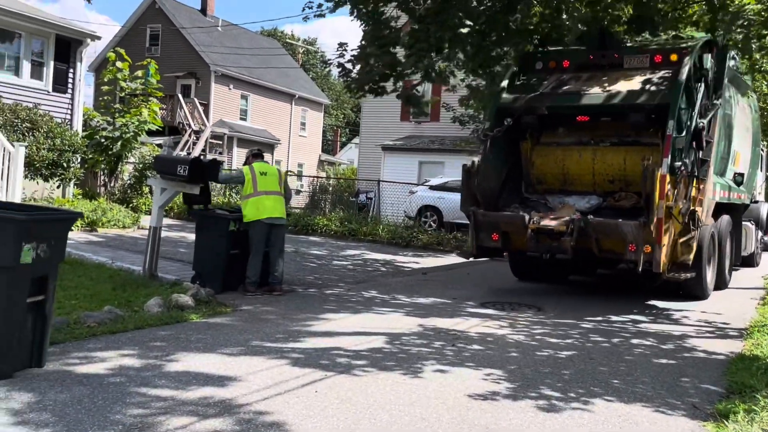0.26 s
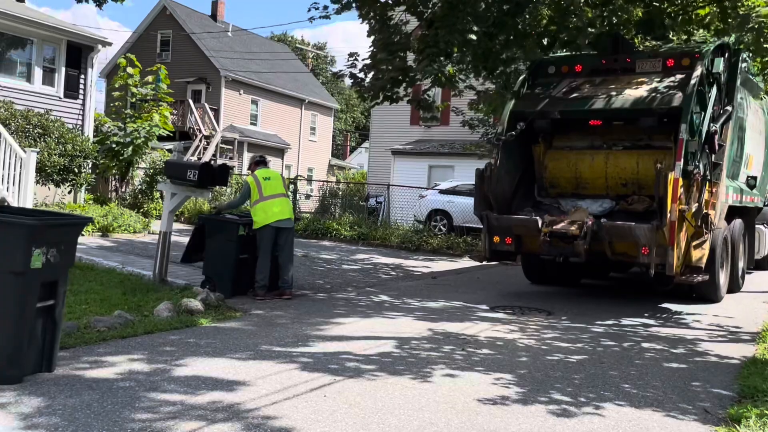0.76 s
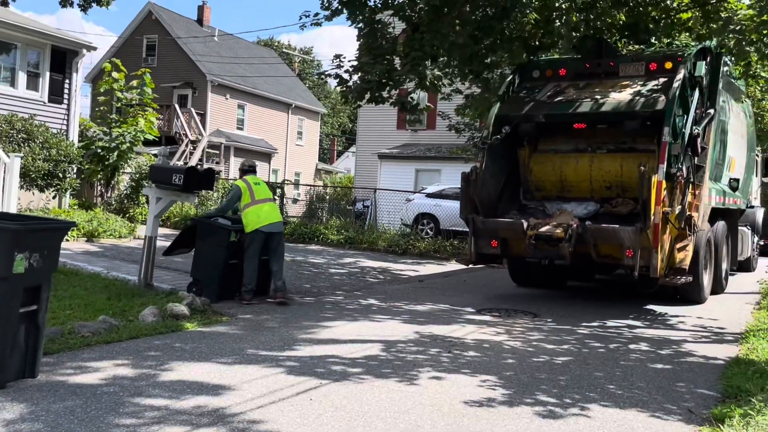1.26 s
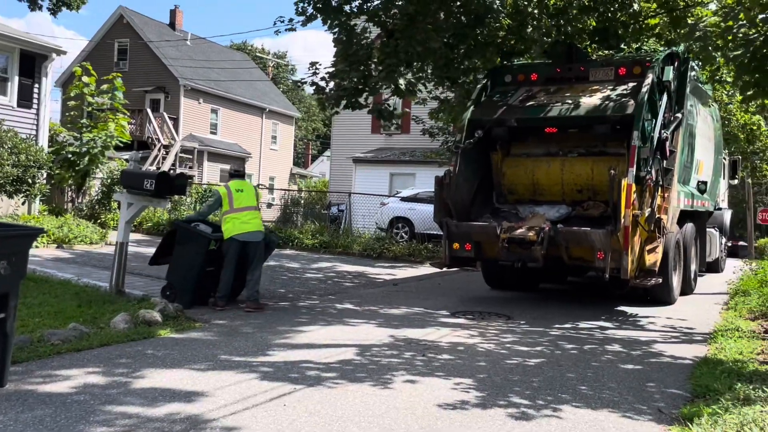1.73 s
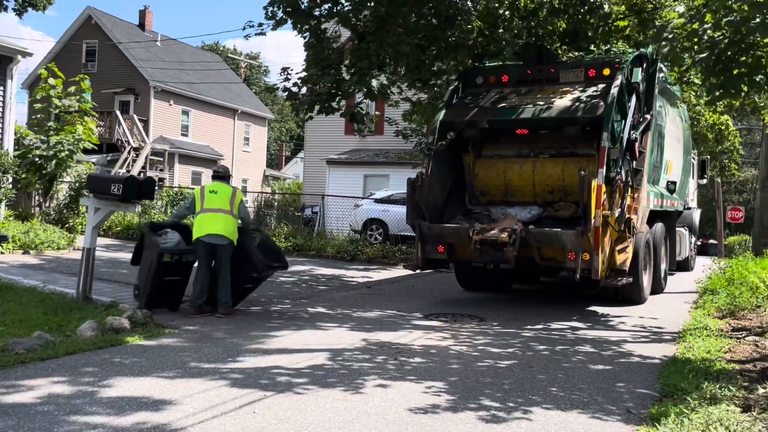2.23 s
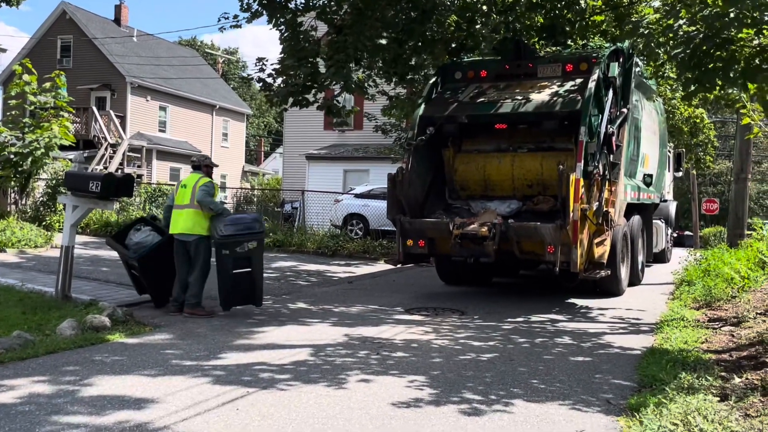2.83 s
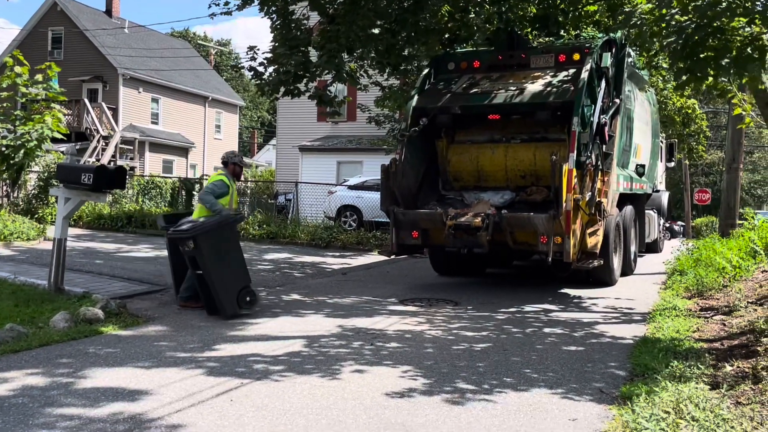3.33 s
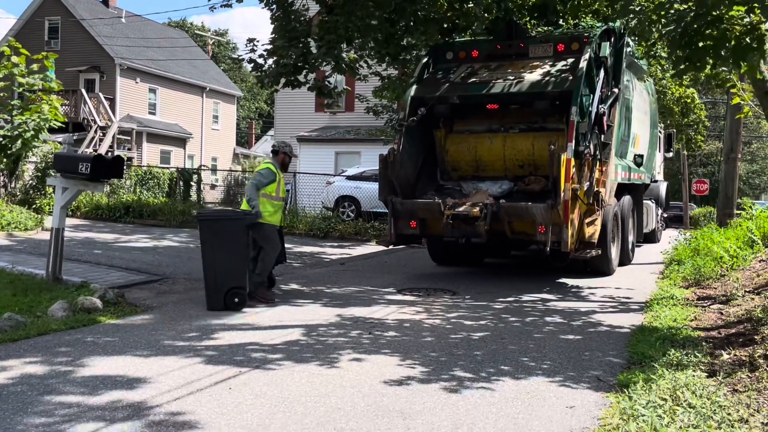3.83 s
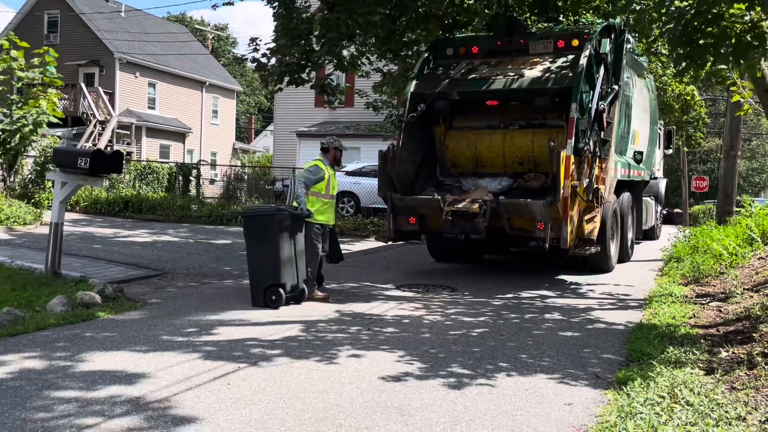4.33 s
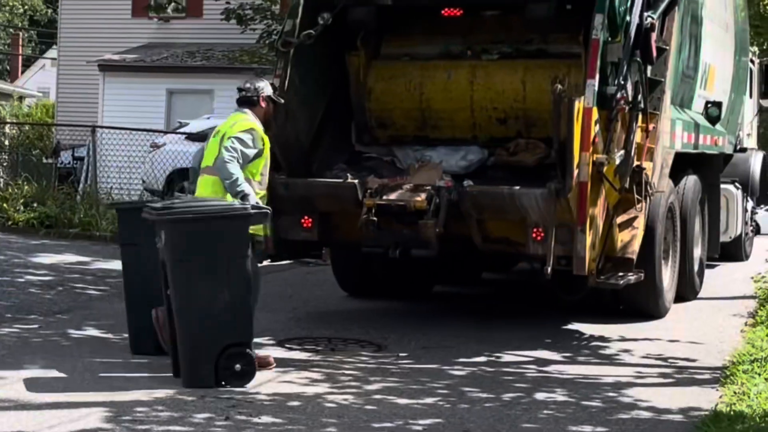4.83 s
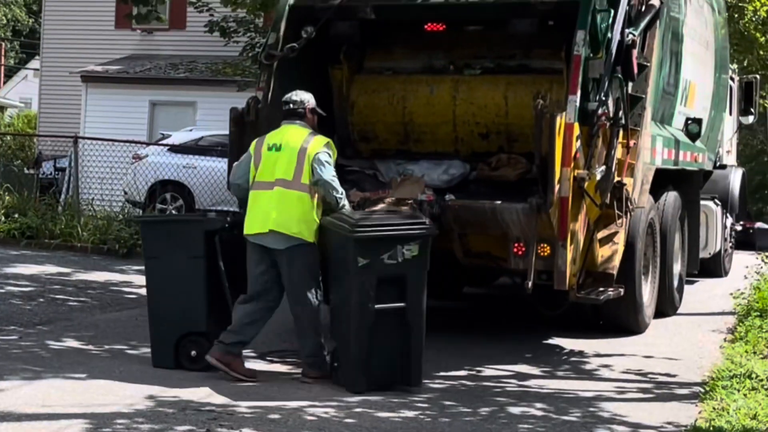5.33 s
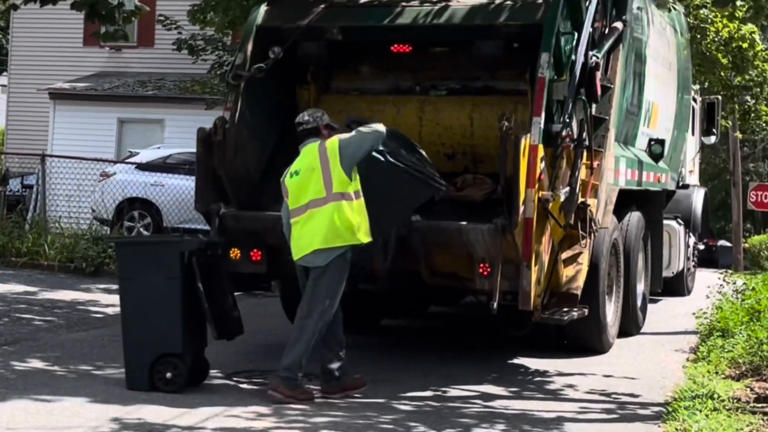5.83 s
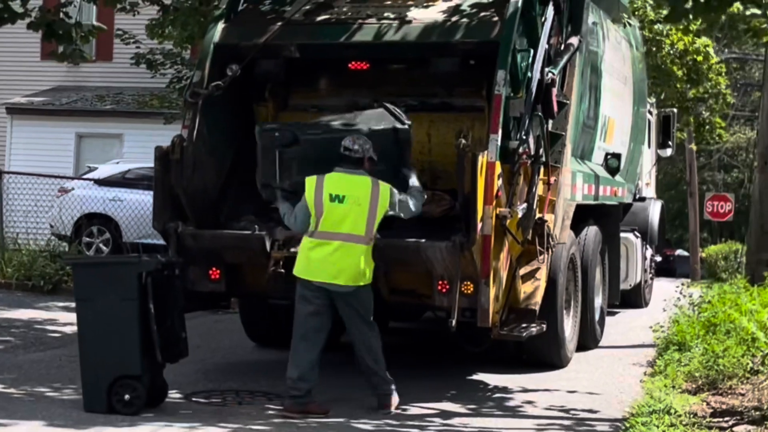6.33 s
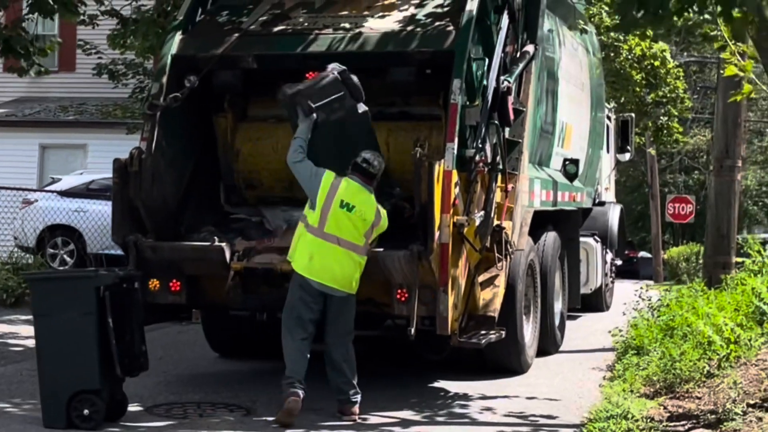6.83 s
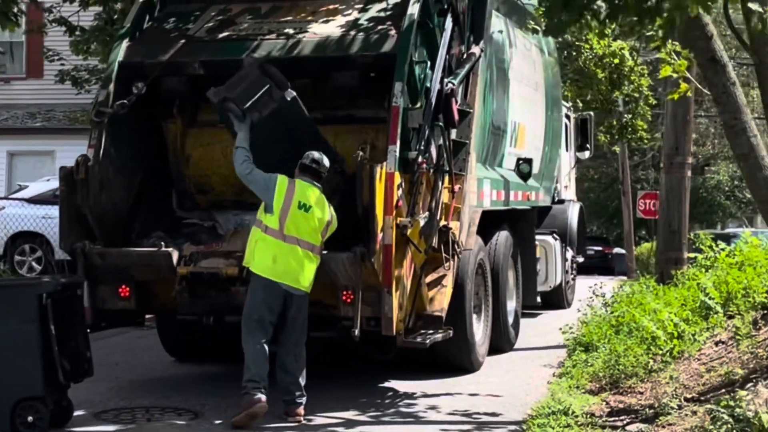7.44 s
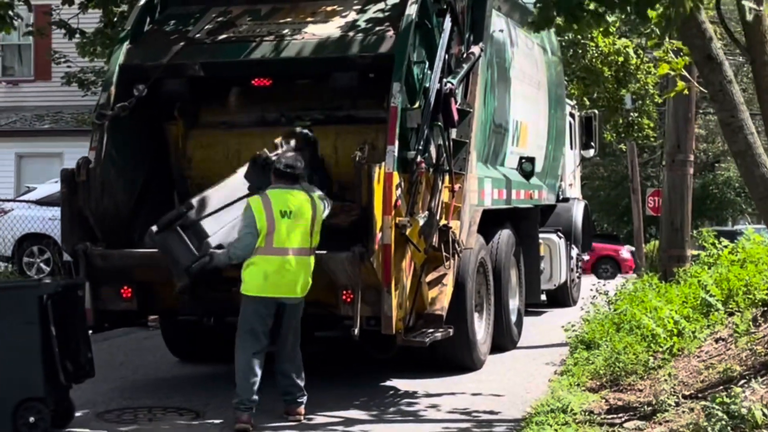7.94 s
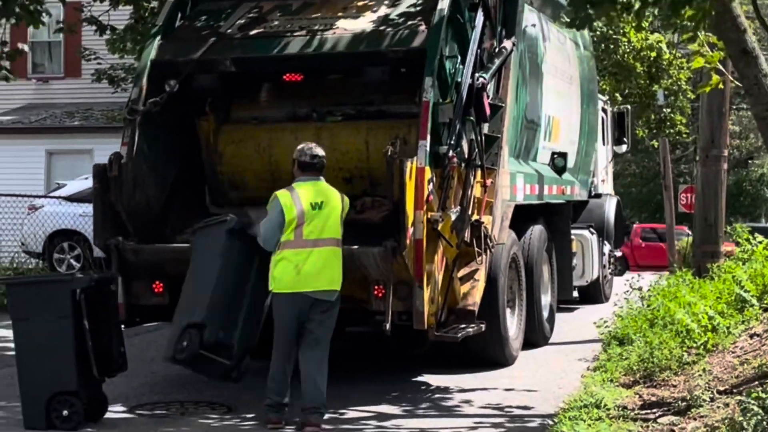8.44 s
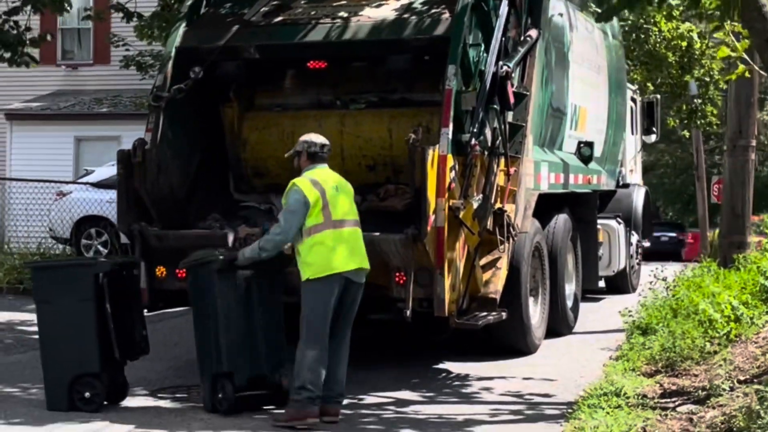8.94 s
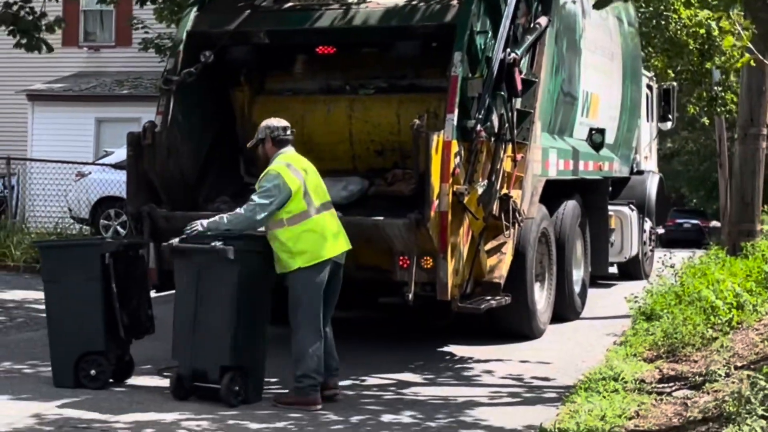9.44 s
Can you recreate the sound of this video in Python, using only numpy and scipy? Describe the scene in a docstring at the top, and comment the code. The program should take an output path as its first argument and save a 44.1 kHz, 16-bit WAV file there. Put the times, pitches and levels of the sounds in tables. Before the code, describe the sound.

A garbage truck idles on a street while hollow plastic bins are wheeled over asphalt, banged against its hopper and set down.

```python
"""A diesel refuse truck idles on a street while a second engine drones and whines nearby.
An air valve puffs, a hinge squeaks and a worker slams bin lids; from 3 s hollow plastic bins
trundle over the asphalt. Near 4 s the second engine fades and the truck grows louder as the
listener draws near. A hydraulic pump swells in by 5 s; a bin bangs on the hopper sill and drops back.
House fronts echo the bins, and a phone with two close microphone ports hears it all."""
import sys
import numpy as np
from scipy import signal
from scipy.fft import rfft, irfft, next_fast_len
from scipy.io import wavfile
from scipy.ndimage import uniform_filter1d, map_coordinates

SR = 44100
rng = np.random.default_rng(int(sys.argv[2]) if len(sys.argv) > 2 else 0)


def log_audio(samples):
    """Write samples as a 16-bit WAV file to the path given in sys.argv[1]."""
    # one column per channel
    frames = np.atleast_2d(samples).T
    # limit to full scale, then quantise
    limited = np.clip(frames, -1, 1)
    pcm = np.round(limited * 32767).astype(np.int16)
    wavfile.write(sys.argv[1], SR, pcm)


N = 426447
TIME_S = np.arange(N) / SR


def amp(db):
    """dB to gain."""
    return 10 ** (np.asarray(db) / 20)


def unit(x):
    """Scaled to rms 1."""
    return x / np.sqrt(np.mean(abs(x) ** 2) + 1e-20)


def along(points, hz):
    """(Hz, value) points interpolated on a log axis."""
    point_hz, values = np.transpose(points)
    return np.interp(np.log(hz + 1), np.log(point_hz + 1), values)


def wobble(rate_hz):
    """Smooth random curve, rate_hz knots a second."""
    return map_coordinates(rng.standard_normal(int(N * rate_hz / SR) + 4), [TIME_S * rate_hz])


def held(start_s, length_s, level_db, rise_s, fall_s):
    """Gain that swells up to its start, holds, then dies; 23.5 dB per rise or fall time."""
    before = np.maximum(start_s - TIME_S, 0) / rise_s
    after = np.maximum(TIME_S - start_s - length_s, 0) / fall_s
    return amp(level_db - 23.5 * (before + after))


def filtered(x, response):
    """x times a complex response of frequency."""
    size = next_fast_len(N + SR // 2)
    return irfft(rfft(x, size) * response(np.fft.rfftfreq(size, 1 / SR)), size)[..., :N]


def coloured(x, spectrum):
    """x through a smooth spectrum that keeps the power of white noise."""
    return filtered(x, lambda hz: unit(amp(along(spectrum, hz))))


def rung(x, modes):
    """x through causal resonances that keep the power of white noise."""
    def bank(hz):
        return unit(sum((-1) ** k * amp(db) * 1j * hz * width / (centre ** 2 - hz ** 2 + 1j * hz * width)
                        for k, (centre, width, db) in enumerate(modes)))
    return filtered(x, bank)


def bursts(starts_s, levels_db, t60_s, attack_s):
    """Noise that jumps up at each start and dies away."""
    t, power = np.arange(SR // 2) / SR, np.zeros(N + SR)
    for start, db in np.broadcast(starts_s, levels_db):
        power[round(start * SR):][:len(t)] += amp(db - 60 * t / t60_s) ** 2 * (1 - np.exp(-t / attack_s))
    return np.sqrt(power[:N]) * rng.standard_normal(N)


def grains(rate_hz, spread_db, decay_s):
    """Dense random knocks of uneven size, rms 1."""
    knocks = (rng.random(N) < rate_hz / SR) * amp(2 * spread_db * rng.standard_normal(N))
    power = signal.lfilter([1], [1, -np.exp(-1 / (decay_s * SR))], knocks)
    return unit(np.sqrt(power) * rng.standard_normal(N))


def struck(starts_s, levels_db, favoured_hz, modes, focus_db_oct, flex=1, contact_s=0.0012):
    """Modes set ringing at once; the spot hit favours one pitch, and flexing plastic varies each ring."""
    t, rings = np.arange(SR // 4) / SR, np.zeros(N + SR)
    hz, width_hz, mode_db = np.transpose(modes)[..., None]
    envelope = np.exp(-np.pi * width_hz * t) * (1 - np.exp(-t / contact_s))
    for start, db, centre_hz in np.broadcast(starts_s, levels_db, favoured_hz):
        share_db = mode_db - focus_db_oct * abs(np.log2(hz / centre_hz))
        share_db += flex * rng.normal(0, 3.5, hz.shape)
        tuned_hz = hz * (1 + flex * 0.035 * rng.standard_normal(hz.shape))
        partials = amp(db + share_db) * envelope * np.sin(2 * np.pi * tuned_hz * t)
        rings[round(start * SR):][:len(t)] += partials.sum(axis=0)
    return rings[:N]


def unsteady_phase(hz, drift):
    """Phase in radians; the rate wanders by the fraction drift."""
    return 2 * np.pi * np.cumsum(hz * (1 + drift * wobble(1.426))) / SR


def tone(phase, flutter_db, orders=((1, 0),)):
    """Sines at multiples of a phase, each fluttering in level."""
    return np.sqrt(2) * sum(amp(db + flutter_db * wobble(5.3)) * np.sin(k * phase + rng.random() * 2 * np.pi)
                            for k, db in orders)


# Crankshaft harmonics. Each row: order, level in dB.
TRUCK_ORDERS = [(3, -46), (6, -40), (8, -50), (12, -50.5), (14, -46), (15, -47.5)]
# Rumble and engine bay spectra. Each row: frequency in Hz, relative density in dB.
RUMBLE_SPECTRUM = [(18, -30), (36, -19), (60, 6), (120, 1), (250, -7.5), (460, -11), (560, -34), (900, -47)]
BAY_SPECTRUM = [(200, -29), (480, 2.5), (680, 0), (1000, 1.5), (1600, -2.5), (2400, -1.5), (2750, -3.5),
                (3100, -7.5), (4500, -11), (7000, -16), (10000, -25), (15500, -71)]


def truck_idle(crank_hz=10.76):
    """Shaft orders over rumble and clatter; six cylinders fire three times a turn, pulsing the clatter."""
    nearness = np.clip((TIME_S - 3.57) / 0.9, 0, 1)
    crank = unsteady_phase(crank_hz, drift=0.0024)
    hum = tone(crank, flutter_db=2, orders=TRUCK_ORDERS)
    rumble_db = -35 + 3 * nearness + 0.32 * wobble(3.8)
    rumble = amp(rumble_db) * coloured(rng.standard_normal(N), RUMBLE_SPECTRUM)
    firing_db = 1.6 * np.sin(3 * crank) + 1.1 * np.cos(6 * crank) + 0.6 * wobble(5)
    clatter = coloured(grains(rate_hz=2000, spread_db=1, decay_s=0.015), BAY_SPECTRUM)
    return hum + rumble + amp(-43 + 3 * nearness + firing_db) * clatter


# Firing harmonics. Each row: order, relative level in dB.
DRONE_ORDERS = [(1, -23), (2, 2), (3, -18), (4, -16), (5, -10), (6, -15), (7, -17), (9, -19), (11, -21)]
# Turbine whine. Each row: frequency in Hz, relative level in dB.
WHINE_BANDS = [(3660, -29), (4265, -29)]


def second_engine(firing_hz=30.2, whine_width_hz=45):
    """Firing drone and narrow bands of turbine whine, fading together."""
    drone = tone(unsteady_phase(firing_hz, drift=0.001), flutter_db=0.8, orders=DRONE_ORDERS)
    whine = sum(amp(db + 6 * wobble(1.77)) * unit(rung(rng.standard_normal(N), [(hz, whine_width_hz, 0)]))
                for hz, db in WHINE_BANDS)
    return held(start_s=0, length_s=3.62, level_db=-33, rise_s=0.1, fall_s=0.9) * (drone + whine)


# Valve openings. Each row: start in seconds, length in seconds, level in dB.
VALVE_PUFFS = [(0.186, 0.15, -38), (2.685, 0.14, -47.5), (3.98, 0.12, -46)]
# Air hiss. Each row: frequency in Hz, relative density in dB.
AIR_SPECTRUM = [(1500, 2), (3500, 5), (5500, 7), (8000, 3), (11000, 3), (15500, -8)]


def air_valves():
    """Hiss of compressed air, opening and closing softly."""
    gate = sum(amp(db) * ((TIME_S > start) & (TIME_S < start + length))
               for start, length, db in VALVE_PUFFS)
    flow = uniform_filter1d(uniform_filter1d(gate, size=3200), size=3200)
    return flow * coloured(rng.standard_normal(N), AIR_SPECTRUM)


def hinge_squeak():
    """Thin, unsteady whistle of the hinge as the lid swings shut."""
    whistle = tone(unsteady_phase(hz=9140, drift=0.001), flutter_db=1.5)
    return held(start_s=0.715, length_s=0.13, level_db=-51, rise_s=0.03, fall_s=0.008) * whistle


# Snaps of lid, axle and grit. Each row: start in seconds, level in dB, brightness in dB.
BIN_SNAPS = [(0.847, -12, -5.5), (0.886, -27, -18), (1.56, -26, -8.5), (2.12, -28.5, -5), (2.311, -23, -10),
             (4.185, -39.5, 13.5), (4.5206, -29.5, 5.5), (4.6402, -13.5, 5.5), (4.792, -26, -10),
             (4.81, -17, 0), (4.902, -20, -4), (4.9123, -13, -7), (4.949, -23, 8), (4.963, -17, -1),
             (5.022, -22, 4), (5.0432, -13.5, -4), (5.213, -22, 1.5), (5.223, -13.5, 0), (5.248, -10, -3.5),
             (5.4206, -17.5, -5.5), (6.5009, -9.5, -8), (6.637, -28.5, -18), (7.848, -15.5, -12),
             (7.949, -20, -14), (8.4002, -20.5, -14), (8.577, -13, -12), (8.591, -21, -3),
             (8.81, -19.5, -6), (8.828, -17.5, -9.5), (8.946, -21.5, -6), (9.0903, -21, -5.5),
             (9.247, -19, -6), (9.2697, -13.5, -5), (9.345, -22.5, -4.5), (9.381, -22.5, 1.5),
             (9.398, -20.5, -4), (9.43, -20.5, 4), (9.4695, -20.5, -2.5), (9.517, -8.5, -0.5),
             (9.561, -13, 1), (9.607, -20.5, 1.5)]
# Bin rattle and grit spectra. Each row: frequency in Hz, relative density in dB.
RATTLE_SPECTRUM = [(1200, 3.5), (2400, 3), (4000, -2), (7000, -15), (15500, -32)]
GRIT_SPECTRUM = [(800, -2.5), (2200, -6.5), (4500, -2), (7000, -4.5), (10000, -10), (15500, -22)]
# Modes of rim and lid, hinge and axle, lid catch. Each row: frequency in Hz, width in Hz, relative dB.
RIM_MODES = [(597, 77, 4), (850, 125, 5), (1003, 70, 1), (1237, 180, -3.5), (1439, 78, -0.5),
             (2004, 47, -12)]
HINGE_MODES = [(2610, 120, 27), (3800, 130, 30.5)]
CATCH_MODES = [(3400, 150, 0), (4050, 140, 0), (4900, 170, -1), (5600, 200, -3)]


def snaps(crunch_s=0.024):
    """Crack, crunch of grit and chatter, brighter for harder contact; rim, hinge and catch ring along."""
    start_s, db, bright_db = np.transpose(BIN_SNAPS)
    hard_db = db + bright_db
    dull = coloured(bursts(start_s, db - bright_db - 17.5, t60_s=0.087, attack_s=0.0029), RATTLE_SPECTRUM)
    crack = bursts(start_s, hard_db - 2.5, t60_s=0.018, attack_s=0.00037)
    lateness, softness = rng.random((2, len(start_s), 4))  # four grit cracks a snap
    crunch = bursts(start_s[:, None] + crunch_s * lateness, hard_db[:, None] - 20 - 8 * softness,
                    t60_s=0.012, attack_s=0.0005)
    chatter = bursts(start_s, hard_db - 10.5, t60_s=0.091, attack_s=0.0024)
    rim = struck(start_s, db - 12.5, favoured_hz=1380, modes=RIM_MODES, focus_db_oct=11.5)
    catch = struck(start_s, db - 13.5, favoured_hz=4630, modes=CATCH_MODES, focus_db_oct=1.8)
    hinge = 0.44 * rung(chatter, HINGE_MODES)
    return dull + coloured(crack + crunch + chatter, GRIT_SPECTRUM) + rim + catch + hinge


def hollow_boom(starts_s, pitches_hz, levels_db, loss_db_cycle=2.03, attack_s=0.0035):
    """A low boom and a panel tuned above it swing and die together."""
    t, boom = np.arange(SR) / SR, np.zeros(N + SR)
    for start, hz, db in zip(starts_s, pitches_hz, levels_db):
        air = np.sin(2 * np.pi * hz * t)
        floor = 0.26 * np.sin(2 * np.pi * (1.4 * hz * t + rng.random()))
        envelope = amp(db - loss_db_cycle * hz * t) * (1 - np.exp(-t / attack_s))
        boom[round(start * SR):][:SR] += envelope * (air + floor)
    return boom[:N]


# Bin wall modes. Each row: frequency in Hz, width in Hz, relative level in dB.
WALL_MODES = [(145.4, 33.6, 5.5), (201.2, 23.8, 4), (237.7, 35.3, 2), (317, 37.5, 4), (357, 71, -2),
              (459.5, 101, -3.5)]


def wall_ring(start_s, pitch_hz, db, split_hz=356, cutoff_hz=2500):
    """The soft plastic wall rings and shudders, giving out little treble."""
    wall = struck(start_s, db - 2, pitch_hz, WALL_MODES, focus_db_oct=47)
    lean_db = 2.5 * np.log2(pitch_hz / split_hz)  # higher blows shudder more in the upper modes
    for modes, cut_db in ((WALL_MODES[:4], lean_db), (WALL_MODES[4:], -lean_db)):
        shudder = bursts(start_s, db - 12.5 - np.maximum(cut_db, 0), t60_s=0.13, attack_s=0.0017)
        wall += rung(shudder, modes)
    return filtered(wall, lambda hz: 1 / (1 + 1j * hz / cutoff_hz) ** 2)


# Heavy blows on a bin. Each row: start in seconds, wall level in dB, wall pitch in Hz,
# boom pitch in Hz, boom level in dB, rim level in dB.
BIN_BLOWS = [(0.849, -15, 173, 134, -17.5, -22), (0.863, -13, 244, 107, -10.5, -23),
             (0.89, -20, 202, 114, -33, -35), (2.307, -9, 368, 132, -28, -25),
             (2.316, -3, 428, 115.3, -11, -18), (2.339, -14, 173, 94.3, -12.5, -27),
             (3.161, -8, 173, 130.3, -9.5, -27), (3.293, -3.5, 358, 109, -13, -17.5),
             (3.711, -9, 212, 134, -25, -27), (4.523, -26, 400, 97.5, -43, -23.5),
             (4.642, -24, 172, 93, -18, -39), (4.849, -11, 400, 112, -40, -16.5),
             (4.956, -20, 195, 88.5, -34, -18), (5.048, -14.5, 318, 114.5, -11.5, -29),
             (5.213, -15.5, 335, 108, -37, -25), (6.512, -13, 201.4, 123.5, -12, -16.5),
             (6.56, -17.5, 223, 48.5, -13, -27), (7.848, -15, 170, 134.7, -12, -13.5),
             (7.869, -5.5, 241, 96.4, -11, -16), (7.887, -14, 240, 125, -9, -15.5),
             (7.938, -7, 173, 46.8, -17, -25), (7.958, -6, 251, 114, -6.5, -14),
             (8.229, -19, 202, 45.7, -26, -23.5), (8.58, 0, 228, 134.4, -7.5, -7),
             (8.597, -5, 220, 76.4, -4, -11.5), (8.638, -28, 218, 82.6, -23, -19),
             (8.7, -22, 200, 80.8, -13, -41), (8.822, -5, 180, 80, -12, -24),
             (8.872, -26, 211, 82, -12, -22.5), (9.363, -9.5, 179, 124, -13.5, -21.5),
             (9.517, -5, 174, 132, -22, -12), (9.565, -7.5, 179, 90, -12, -14.5)]


def blows():
    """Each blow booms, rings wall and rim, and leaves the bin rattling; the deepest booms, near 7.9 and 8.2 s,
    shake the truck's body."""
    start_s, wall_db, wall_hz, boom_hz, boom_db, rim_db = np.transpose(BIN_BLOWS)
    boom = hollow_boom(start_s, boom_hz, boom_db)
    wall = wall_ring(start_s, wall_hz, wall_db)
    rim = struck(start_s, rim_db, favoured_hz=880, modes=RIM_MODES, focus_db_oct=30)
    rim_shudder = rung(bursts(start_s, rim_db - 7, t60_s=0.13, attack_s=0.00043), RIM_MODES)
    rattle = coloured(bursts(start_s, rim_db - 19, t60_s=0.36, attack_s=0.003), RATTLE_SPECTRUM)
    return boom + wall + rim + rim_shudder + rattle


# A bin wheeled, dragged or shaken out.
# Each row: start in seconds, length in seconds, trundle level in dB, scrape level in dB.
BIN_PULLS = [(3.055, 0.51, -28, -54.5), (3.76, 0.62, -23, -50.5), (4.515, 0.23, -20.5, -44.5),
             (4.81, 0.22, -19.5, -41.5), (5.263, 0.2, -38.5, -52), (6.515, 0.045, -35, -38.5),
             (6.923, 0.45, -36, -52), (7.958, 0.068, -18.5, -67), (8.292, 0.048, -22, -40),
             (8.846, 0.066, -21.5, -46.5), (9.159, 0.51, -24.5, -67)]
# Hollow of a rolling bin. Each row: frequency in Hz, width in Hz, relative level in dB.
HOLLOW_MODES = [(77, 36, -8.5), (115, 9.5, -2)]


def wheeling(rise_s=0.083, fall_s=0.092):
    """Hard wheels jolt over the asphalt and shake the whole bin; its edge scrapes on grit."""
    trundle = sum(held(start, length, db - 5.5, rise_s, fall_s) for start, length, db, _ in BIN_PULLS)
    scrape = sum(held(start, length, db - 0.5, rise_s, fall_s) for start, length, _, db in BIN_PULLS)
    jolts = grains(rate_hz=330, spread_db=2.2, decay_s=0.008)
    body = rung(jolts, WALL_MODES) + amp(-1.5) * rung(jolts, HOLLOW_MODES)
    rattle = amp(-9.5) * rung(jolts, RIM_MODES) + amp(-19) * coloured(jolts, RATTLE_SPECTRUM)
    grit = coloured(grains(rate_hz=480, spread_db=6.5, decay_s=0.0056), GRIT_SPECTRUM)
    return trundle * (body + rattle) + scrape * grit


# Hollow knocks on a bin. Each row: start in seconds, level in dB, favoured pitch in Hz.
BIN_CLUNKS = [(3.709, -11, 840), (3.909, -11, 305), (4.611, -15, 820), (7.32, -22, 800), (7.39, -21, 800),
              (7.87, -10, 860), (7.888, -12, 900), (7.938, -18, 1450), (7.951, -14, 930), (7.955, -12, 460),
              (7.999, -14, 2000), (8.228, -13, 1250), (8.585, -6, 400), (8.603, -12, 900),
              (8.724, -21, 900), (9.272, -12, 460), (9.365, -23, 840), (9.385, -13, 440),
              (9.481, -17, 1420), (9.518, -14, 1220), (9.564, -15, 1420)]


def clunks():
    """A knock on one spot rings mainly the wall or rim mode nearest its pitch."""
    start_s, db, hz = np.transpose(BIN_CLUNKS)
    return struck(start_s, db + 3, hz, WALL_MODES + RIM_MODES, focus_db_oct=60, flex=0.3)


def hydraulic_pump():
    """The pump hums on one pitch, swelling slowly and stopping dead."""
    hum = tone(unsteady_phase(hz=245.6, drift=0.002), flutter_db=2)
    return held(start_s=5, length_s=4, level_db=-42, rise_s=2.5, fall_s=0.005) * hum


# Street decay. Each row: frequency in Hz, T60 in seconds.
STREET_T60 = [(100, 1), (1000, 0.084), (8000, 0.34)]


def street_echo(x, delay_samples=700):
    """House fronts return a noise tail whose bands die at their own speeds."""
    hz, t, bands = signal.stft(rng.standard_normal(SR // 2), SR, nperseg=256)
    decay = amp(-60 * t / along(STREET_T60, hz)[:, None])
    tail = signal.istft(bands * decay, SR, nperseg=256)[1]
    return signal.fftconvolve(np.pad(x, (delay_samples, 0)), tail / np.linalg.norm(tail))[:N]


# Diffuse share that differs between the ports. Each row: frequency in Hz, gain in dB.
DIFFUSE_SHARE = [(60, -15.5), (200, -17), (400, -15.5), (800, -7.5), (1300, -3.5), (2400, -8), (4400, -25),
                 (7000, -29), (15000, -13)]


def scattered(x):
    """Sound returns from many sides with shuffled phases."""
    bands = signal.stft(x, nperseg=256)[2]
    bands *= np.exp(2j * np.pi * rng.random(bands.shape))
    shuffled = 1.09 * signal.istft(bands, nperseg=256)[1][:N]
    return filtered(shuffled, lambda hz: amp(along(DIFFUSE_SHARE, hz)))


def scene():
    """Bins, their echo and the machines in the middle; scattered sound gives width."""
    bins = blows() + clunks() + snaps() + wheeling() + hinge_squeak()
    mid = bins + amp(-10.5) * street_echo(bins)
    mid += truck_idle() + second_engine() + air_valves() + hydraulic_pump()
    side = scattered(mid)
    return np.array([mid + side, mid - side])


# Port level difference. Each row: frequency in Hz, left minus right in dB.
PORT_BALANCE = [(60, -0.5), (130, -0.5), (290, 0.0), (640, 1.0), (1410, 2.0), (3100, 1.5), (6820, 0.5),
                (15000, 0.0)]
# Port phase difference. Each row: frequency in Hz, left minus right in radians.
PORT_PHASE = [(0, 0), (6030, 0), (6720, -.9), (7840, -3), (8870, -3.4), (10500, -5.9), (12800, -6.8),
              (14200, -9.4), (16100, -9.4)]


def record(dry, ceiling=0.93, top_hz=15850):
    """The ports differ in level and, above 6 kHz, in phase; peaks are rounded, the top band is cut."""
    half = np.array([[0.5], [-0.5]])

    def ports(hz):
        return amp(half * along(PORT_BALANCE, hz)) * np.exp(1j * half * along(PORT_PHASE, hz))
    heard = filtered(dry, ports)
    rounded = heard / (1 + abs(heard / ceiling) ** 6) ** (1 / 6)
    return filtered(rounded, lambda hz: hz < top_hz)


dry = scene()
out = record(dry)
log_audio(out)
```